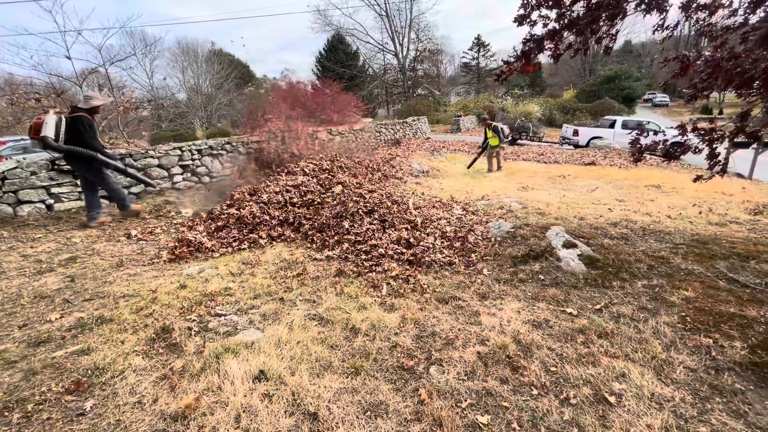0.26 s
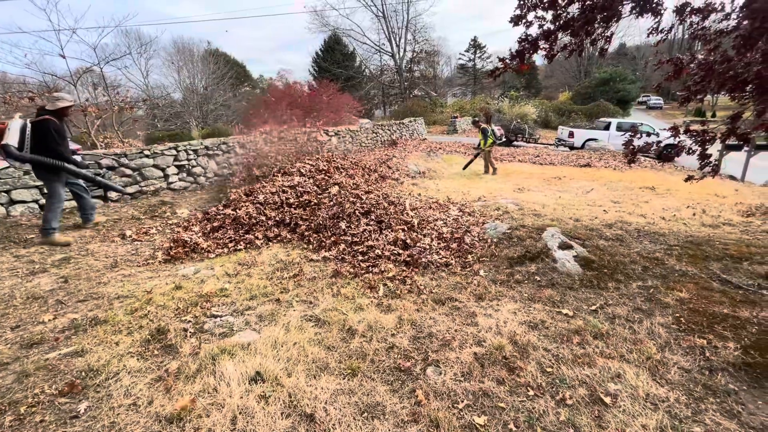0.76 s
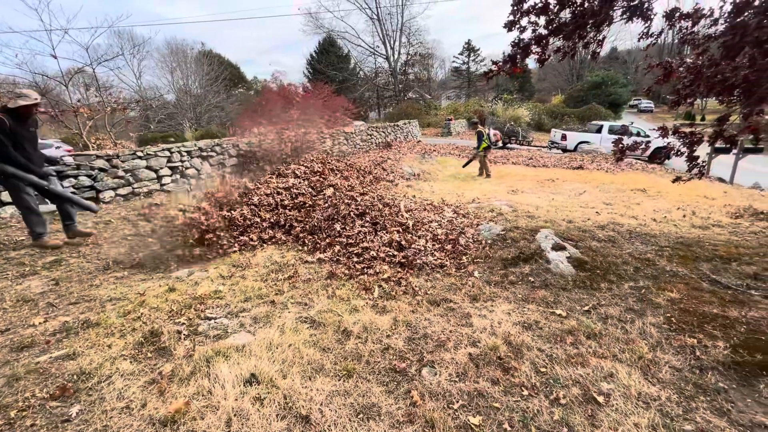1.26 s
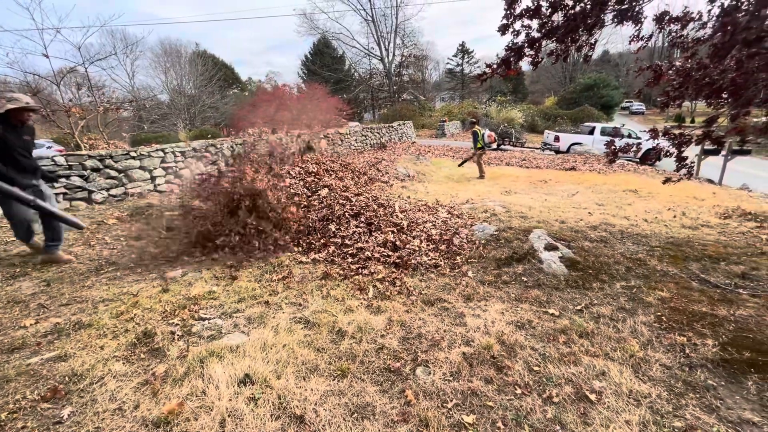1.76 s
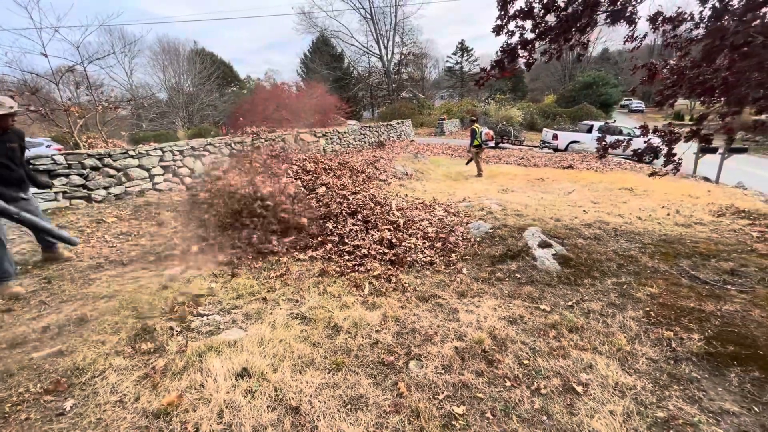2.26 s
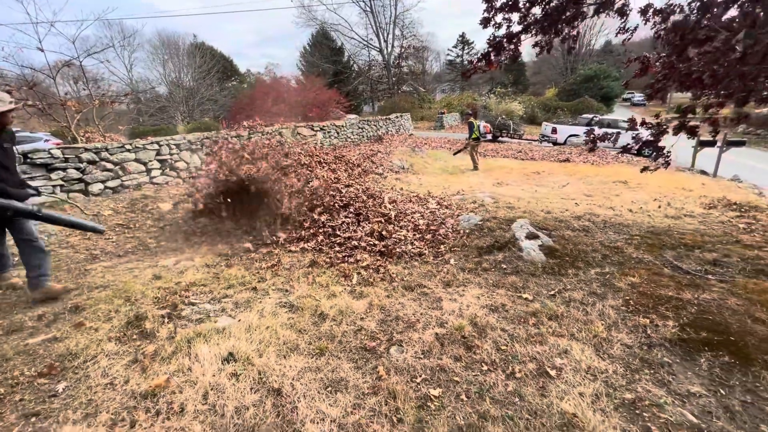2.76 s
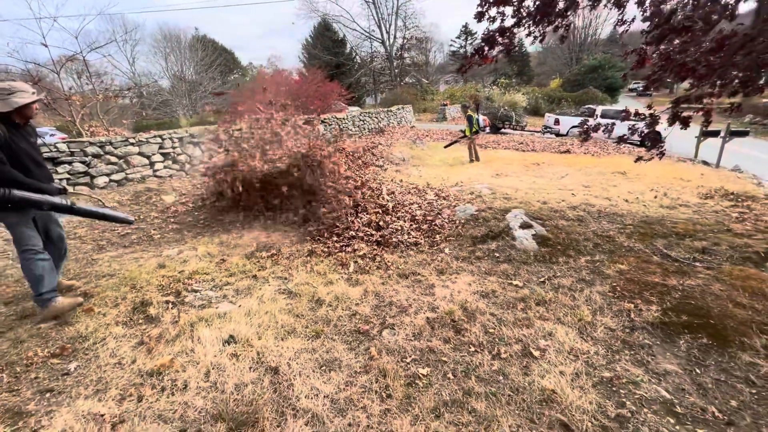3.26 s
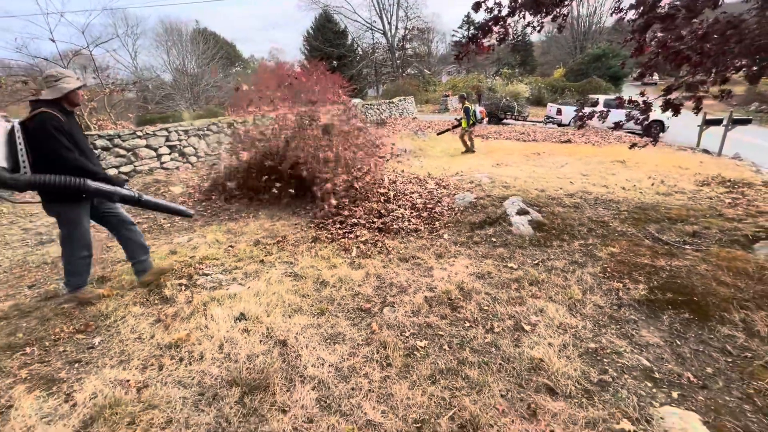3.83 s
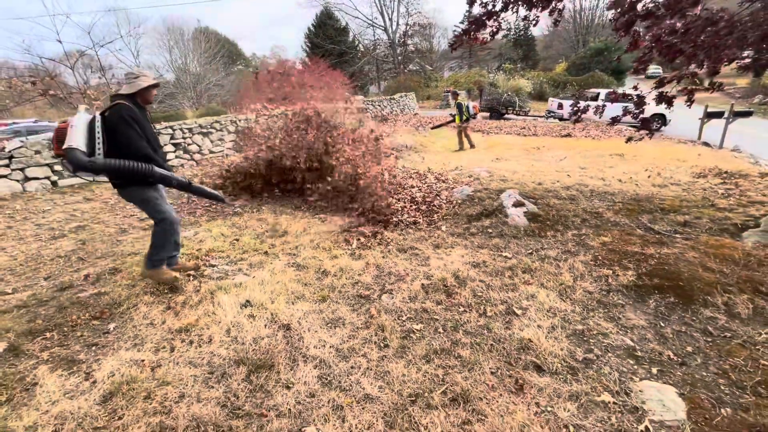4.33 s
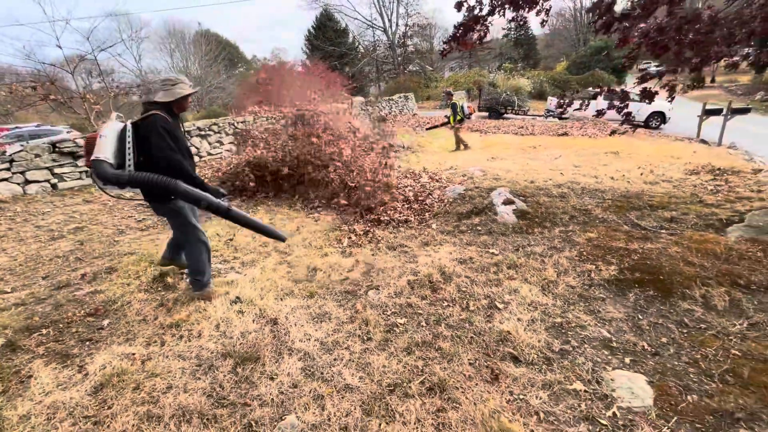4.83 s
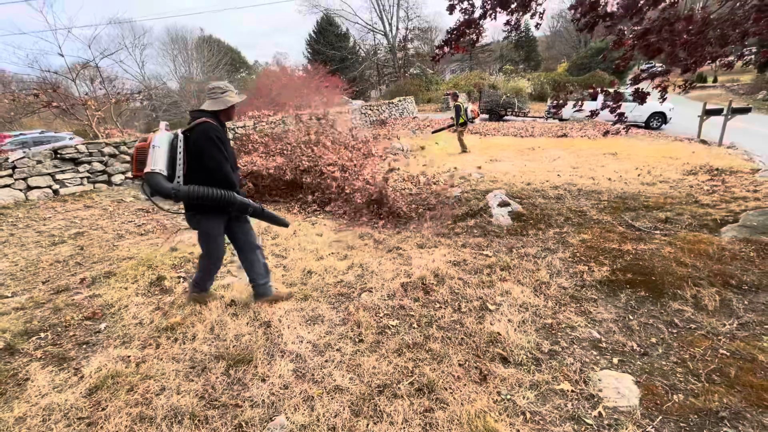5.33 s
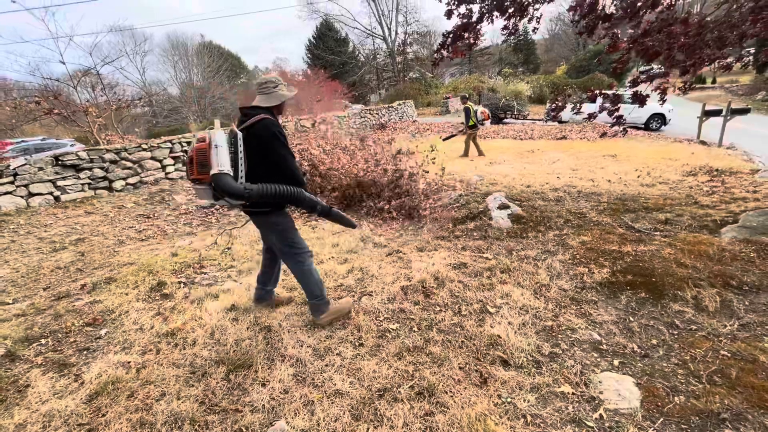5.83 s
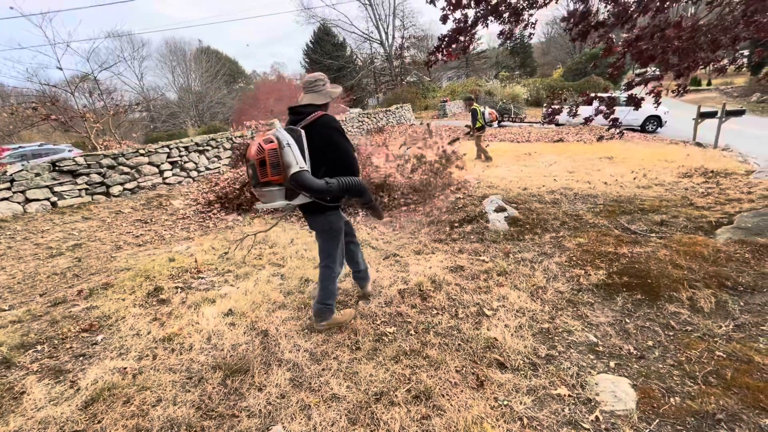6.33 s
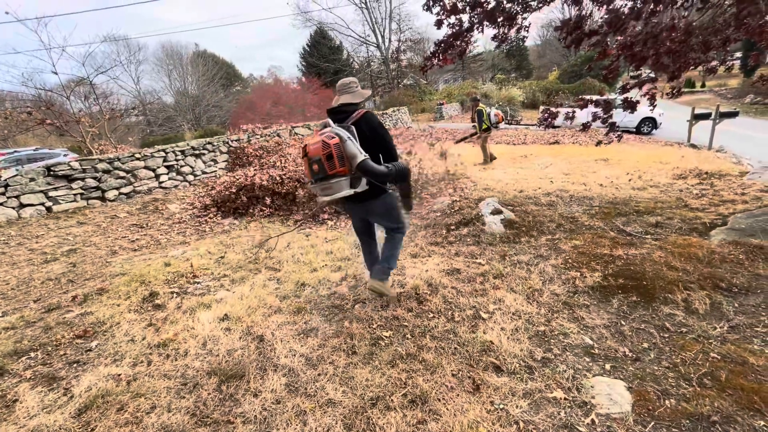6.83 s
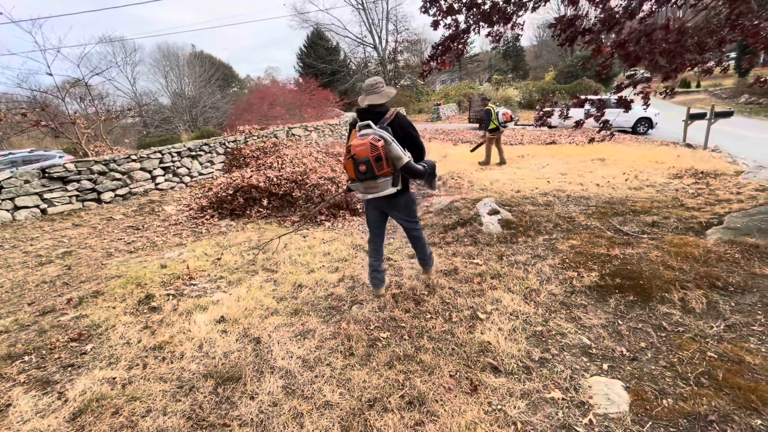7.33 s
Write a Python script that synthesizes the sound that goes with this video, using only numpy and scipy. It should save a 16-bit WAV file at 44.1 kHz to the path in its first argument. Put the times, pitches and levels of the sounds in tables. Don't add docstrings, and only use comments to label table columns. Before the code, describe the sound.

Continuous raspy leaf blower noise in an open yard, with dry leaves churning in a broad rush. The engine speed stays nearly constant while its tone shifts as the worker walks and turns. A second blower climbs in pitch in the distance, then dies away. Low, lumpy wind gusts hit the handheld stereo microphone, slightly stronger on the right; the near machine starts at left and ends almost straight ahead.

```python
import sys
import numpy as np
from scipy import signal
from scipy.io import wavfile
from scipy.ndimage import uniform_filter1d, map_coordinates

SR = 44100
rng = np.random.default_rng(int(sys.argv[2]) if len(sys.argv) > 2 else 0)


def rack_gain(trim_db):
    fader = np.asarray(trim_db, float)
    return 10 ** (fader / 20)


def transcribe(signal):
    frames = np.atleast_2d(signal).T
    limited = np.clip(frames, -1, 1)
    pcm = np.round(limited * 32767).astype(np.int16)
    wavfile.write(sys.argv[1], SR, pcm)


N = 334719
HZ = np.fft.rfftfreq(1024, 1 / SR)[:, None]


def stft(x):
    return signal.stft(x, nperseg=1024, noverlap=768)[2]


def istft(z):
    return signal.istft(z, nperseg=1024, noverlap=768)[1][..., :N]


def along(points, hz, order=1):
    p = np.transpose(points)
    return np.interp(np.log(hz + 1), np.log(p[0] + 1), p[order])


def curves(rows, size=N):
    s, *cols = np.transpose(rows)
    steps = np.linspace(0, N / SR, size)
    return [np.interp(steps, s, c) for c in cols]


def wobble(rate):
    coarse = np.arange(0, N + 64, 64)
    knots = rng.standard_normal(int(N / SR) * 40)
    return np.interp(np.arange(N), coarse, map_coordinates(knots, [coarse * rate / SR]))


def rush(spectrum, centres_hz, levels_db, patchy_db, gate=1, size=(9, 14), repeat=0):
    z = stft(gate * (rng.standard_normal(N) + repeat))
    patches = uniform_filter1d(rng.standard_normal(z.shape), size=size[0], axis=0)
    patches = uniform_filter1d(patches, size=size[1], axis=1)
    steps = np.linspace(0, 1, z.shape[1])
    level = 0
    for row, curve in zip(np.eye(len(centres_hz)), levels_db):
        weight = along(list(zip(centres_hz, row)), HZ)
        level = level + weight * np.interp(steps, np.linspace(0, 1, len(curve)), curve)
    return z * rack_gain(along(spectrum, HZ) + level + patchy_db * patches / patches.std())


def bounce(share, ms):
    return 1 + share * np.exp(-2j * np.pi * HZ * ms / 1000)


def follow(layers):
    # t/s, nearness/dB, muffler, housing and nozzle turned to the phone (level/dB each)
    walk_rows = [(0.0, -25.5, -40, -41, -30), (0.04, -26.5, -39, -31.5, -33.5), (0.78, -27, -34, -35, -31),
                 (1.06, -29, -30, -37, -37), (1.29, -30, -33, -35.5, -36.5), (1.94, -28, -28, -35, -38.5),
                 (2.18, -24.5, -36.5, -37, -36.5), (2.26, -29, -30, -28, -38), (2.71, -26.5, -35, -38, -37),
                 (3.4, -26.5, -29.5, -30.5, -37), (4.59, -27.5, -25, -28.5, -30.5),
                 (4.69, -27.5, -26, -25.5, -34.5), (5.12, -26, -24.5, -27.5, -27),
                 (5.45, -29, -24.5, -24, -28), (6.26, -29, -25, -32.5, -27.5), (6.59, -29, -24, -30.5, -34),
                 (7.53, -30.5, -26, -27, -35.5), (7.59, -32, -22, -24, -35)]
    walk, table = np.array(curves(walk_rows)), np.array(layers)
    return table[:, :1] + table[:, 1:] @ (walk - walk.mean(axis=1, keepdims=True))


def far_blower():
    # t/s, fourth order f/Hz, level/dB
    far_speed = [
        (0, 166, -77),
        (1, 179, -50),
        (1.5, 195.6, -39),
        (2, 215, -39),
        (2.5, 222.2, -37),
        (3, 227.5, -37.5),
        (3.6, 238, -38.5),
        (4.2, 245, -30),
        (7.6, 248, -58),
    ]
    # multiple of its cycle rate, level/dB at full speed, loss/dB per Hz below it
    far_orders = [(4, 0, 0), (6, -14, 0), (10, -7, .5), (11, -8, .5), (12, -13, 0)]
    full_hz = 235
    hz, db = curves(far_speed)
    turn = 2 * np.pi * np.cumsum(hz / 4 * (1 + 0.003 * wobble(9))) / SR
    short_hz = np.clip(full_hz - hz, 0, None)
    tone = np.zeros(N)
    for k, level, loss in far_orders:
        tone += rack_gain(level - loss * short_hz + 2.6 * wobble(4.03)) * np.sin(k * turn)
    return rack_gain(db + 2) * tone


def wind():
    # t/s, peak level/dB, half length/s
    gusts = [(1.123, -37, 0.11), (1.6, -38, 0.36), (2.002, -27, .15), (2.4, -31.5, 0.36), (3.08, -30, 0.15),
             (3.36, -28, 0.18), (3.636, -28.5, 0.13), (4.2, -37, 0.14), (4.664, -29, .1), (5.18, -30, .08),
             (5.5, -36, 0.16), (6.6, -38, .1), (7.095, -34, .2)]
    # f/Hz, level/dB per Hz
    buffet = [(15, -40), (30, -24), (45, -19), (60, 1), (150, -10), (300, -18), (600, -26), (1200, -90)]
    breeze_db = -39
    t = np.linspace(0, N / SR, 400)
    pressure = rack_gain(breeze_db)
    for s, db, half_s in gusts:
        pressure = pressure + rack_gain(db) * np.exp(-((t - s) / half_s) ** 2)
    level = 20 * np.log10(pressure)
    return [rush(buffet, [60], [level + db], patchy_db=3.5, gate=rack_gain(1.8 * wobble(19))) for db in (19, 22)]


def leaves():
    rustle_levels = [
        (-33.5, -0.55, 0.31, 0.033, 0.52),
        (-31.5, -0.3, 0.063, 0.072, 0.28),
    ]
    # f/Hz, level/dB per Hz
    rustle_spectrum = [(30, -50), (100, 1.5), (400, -2.5), (1200, 4.5), (3000, -1.5), (6000, -2),
                       (9000, -7), (11500, -20), (13500, -38), (15000, -35)]
    level = follow(rustle_levels) + 8
    level = level + .7 * wobble(6)
    return [rush(rustle_spectrum, [2000, 6000], level, patchy_db=2.45, gate=rack_gain(0.68 * wobble(25)))
            for port in "LR"]


def crankshaft():
    # t/s, cycle rate f/Hz
    cycle_speed = [(0, 62.58), (1.2, 62.62), (1.85, 62.8), (2.3, 62.52), (3.2, 62.42), (5.2, 62.48),
                   (6, 62.6), (7.59, 62.42)]
    cycle_hz = uniform_filter1d(curves(cycle_speed)[0], size=SR // 4)
    return 2 * np.pi * np.cumsum(cycle_hz * (1 + .001 * wobble(14))) / SR


def lag(k):
    lag_cycles, smear = .7, .11
    housing = 2 * np.pi * k * lag_cycles + smear * (k - 11) ** 2 + .55 * (k % 2)
    return 0.04053 * k * k - 1.28 * (k % 2) + (k >= 8) * housing


def engine_orders(turn):
    group_levels = [
        (-26, 1, 0, 0.23, 0),
        (-30, -.5, 1.11, 0.3, 0),
        (-30, 1, 0.77, 0.44, 0.021),
        (-23, 0.35, 0, 0.71, 0.015),
        (-21, -0.28, 0.26, 0, 0.31),
    ]
    multiples = [(1, -12), (2, 1.74), (3, -12.5), (4, -5), (5, 1), (6, 6), (7, -14), (8, -22.5), (9, -6.5),
                 (10, -4.5), (11, -9), (12, -15), (14, -9), (15, -11.5), (16, -16.5), (17, -23), (18, -29),
                 (19, -20), (20, -25.5), (21, -15), (22, -19.5), (23, -28), (25, -39), (26, -17), (27, -31),
                 (28, -25), (29, -27), (30, -25)]
    groups = follow(group_levels)
    exhaust = np.zeros(N)
    for k, db in multiples:
        group = groups[np.searchsorted([2.5, 4.5, 6.5, 11.5], k)]
        flutter = min(k / 6, 1) * 1.2 * wobble(5)
        sway = .02 * k * wobble(5)
        exhaust += rack_gain(group + db + flutter + 0.5) * np.cos(k * turn - lag(k) + sway)
    return exhaust


def impeller(turn):
    # t/s, order 13 level/dB, order 24 level/dB
    whistle_levels = [(0.0, -31, -34), (0.5, -55, -39), (0.8, -36, -40), (1.05, -25.5, -34),
                      (1.5, -27, -39), (1.9, -31, -32.5), (2.6, -27, -32), (3.5, -27.5, -36),
                      (4.4, -28.5, -36), (4.8, -27.5, -32), (5.1, -25, -26.5), (5.5, -33, -27),
                      (6.0, -24.5, -30), (6.5, -22.5, -35), (7.1, -21.5, -53), (7.6, -28.5, -53)]
    whistle = np.zeros(N)
    for k, db in zip((13, 24), curves(whistle_levels)):
        whistle += rack_gain(db + 3 + 1.1 * wobble(6)) * np.cos(k * turn - lag(k) + .25 * wobble(5))
    return whistle


def puffs(turn):
    jet_lag = .55
    swell_db = 2.83 * np.cos(turn - 2 * np.pi * jet_lag) + 0.98 * np.cos(2 * turn)
    return rack_gain(swell_db + 0.69 * wobble(30))


def exhaust_roar(puff):
    # f/Hz, level/dB per Hz
    roar_spectrum = [(30, -25), (50, -3), (90, -15), (220, 2.5), (420, -2), (600, 8), (800, 11),
                     (1050, -8.5), (1400, -62), (2500, -90)]
    roar_levels = [
        (-28.5, 0.83, 0.075, 0, 0),
        (-21, -0.94, 0.86, 0, 0),
        (-23.5, 0.72, .1, 0.47, 0.042),
        (-19.5, 1, .1, 0, 0.014),
    ]
    return rush(roar_spectrum, [118, 293, 600, 910], follow(roar_levels), patchy_db=.9, gate=puff, size=(4, 40))


def air_jet(turn, puff):
    # f/Hz, level/dB per Hz
    nozzle_spectrum = [(400, -90), (700, -61), (1050, -7), (1400, -1.5), (2500, -3.5), (3200, 0.5),
                       (4300, -11), (5500, -0.5), (7200, 0), (9000, -3), (9800, 4), (11500, -14.5),
                       (12300, -54), (13500, -42), (15000, -68)]
    jet_levels = [
        (-31.5, 0.65, .1, 0.0045, -1.26),
        (-33.5, 0.27, 0.072, 0.13, 1.23),
        (-29.5, 0.72, 0.15, 0.11, 0.94),
        (-39.5, 0.64, 0.42, 0.28, 0.12),
    ]
    strokes = rng.standard_normal((9, 706))
    place = turn / (2 * np.pi) % 1 * 705
    clatter = map_coordinates(strokes, [np.linspace(0, 8, N), place], order=1)
    return rush(nozzle_spectrum, [1500, 3600, 4800, 7040], follow(jet_levels) + 9, patchy_db=1.8, gate=puff,
                size=(6, 90), repeat=0.88 * clatter)


def blower():
    # t/s, stone wall delay/ms, ground delay/ms
    echo_paths = [(0.0, 4.2, 2.52), (0.45, 3.77, 1.84), (0.89, 3.8, 1.65), (1.34, 4.25, 1.48),
                  (1.79, 4.34, 1.59), (2.23, 4.12, 1.6), (2.68, 4.34, 1.52), (3.13, 4.34, 1.43),
                  (3.57, 4.35, 1.58), (4.02, 4.2, 1.57), (4.46, 4.14, 1.66), (4.91, 4.16, 1.6),
                  (5.36, 3.85, 1.52), (5.8, 3.67, 1.53), (6.25, 4.04, 1.52), (6.7, 3.96, 1.42),
                  (7.14, 3.98, 1.44), (7.59, 3.83, 1.38)]
    turn = crankshaft()
    puff = puffs(turn)
    jet = air_jet(turn, puff)
    wall_ms, turf_ms = curves(echo_paths, size=jet.shape[1])
    spread = 0.5 * np.clip((HZ - 120) / 60, 0, 1)
    exhaust = stft(engine_orders(turn)) * bounce(spread, wall_ms) * bounce(spread, turf_ms)
    return exhaust + stft(impeller(turn)) + exhaust_roar(puff), jet


def two_ports(motor, jet, rustle_l, rustle_r):
    # t/s, engine bearing (1 left, 0 ahead), nozzle bearing, ground delay/ms, ground share
    bearings = [(0.0, 0.97, 0.99, 1.46, 0.12), (0.75, 1.02, 1.02, 1.41, 0.29),
                (1.5, 1.04, 0.91, 1.37, 0.11), (2.1, 1.0, 0.86, 1.24, 0.03), (2.6, 0.94, 0.87, 1.3, 0.1),
                (3.0, 1.02, 1.0, 1.39, 0.17), (3.75, 1.06, 1.04, 1.4, 0.25), (4.0, 0.96, 1.02, 1.42, 0.11),
                (4.5, 0.85, 1.0, 1.37, 0.16), (4.75, 0.85, 0.98, 1.29, 0.09),
                (5.25, 0.78, 0.96, 1.36, 0.31), (6.0, 0.78, 0.9, 1.44, 0.1), (6.25, 0.7, 0.86, 1.47, 0.13),
                (6.5, 0.6, 0.3, 1.45, 0.17), (7.0, 0.35, 0.2, 1.45, 0.14), (7.59, 0.18, 0.12, 1.55, 0.22)]
    # f/Hz, phase/rad
    lead = [(125.0, 0.5), (310.0, 0.84), (440.0, 1.8), (500.0, 2.77), (560.0, 2.6), (650.0, 2.94),
            (750.0, 1.8), (850.0, 1.65), (1000.0, 2.1), (1500.0, 2.75), (2300.0, 7.4), (3200.0, 11.76),
            (4000.0, 14.3), (5000.0, 16.7), (6000.0, 20.7)]
    # f/Hz, loss/dB
    shade = [(125.0, 1.4), (330.0, -1.5), (440.0, 0.2), (500.0, 1.5), (560.0, 8), (650.0, 6.5),
             (750.0, 18.5), (850.0, 0.5), (1000.0, 4), (1400.0, 3.5), (2000.0, 1.4), (3000.0, 5),
             (4500.0, 4.5), (5500.0, 11), (7000.0, 14.5)]
    # f/Hz, phase/rad, loss/dB
    shared_port = [(7900, 2.8, 8), (8300, 2.2, 4), (8600, 0, 3), (9000, -0.7, 2), (9600, -2.8, .5),
                   (11000, -3.7, 0), (11400, -5.5, 0), (11800, -2 * np.pi, 0)]
    engine_side, nozzle_side, delay_ms, share = curves(bearings, size=jet.shape[1])
    share = np.clip(2.37 * share, 0, 1)
    high = np.clip((HZ - 1100) / 400, 0, 1)
    bearing = engine_side + high * (nozzle_side - engine_side)
    top = np.clip((HZ - 7200) / 1200, 0, 1)
    left = motor + jet * bounce(share, delay_ms) + rustle_l
    steeper = bounce(.7 * share, delay_ms - .2 * nozzle_side)
    late = (motor + jet * steeper + 0.2 * rustle_l) * np.exp(-1j * bearing * along(lead, HZ))
    apart = (late + 1.35 * rustle_r) * rack_gain(-along(shade, HZ))
    shared = (left + 1.3 * rustle_r) * np.exp(-1j * along(shared_port, HZ))
    shared = shared * rack_gain(-along(shared_port, HZ, order=2))
    return left, (1 - top) * apart + top * shared


def scene():
    left, right = two_ports(*blower(), *leaves())
    gust_l, gust_r = wind()
    return istft(np.array([left + gust_l - 0.18 * gust_r, right + gust_r])) + far_blower()


def top_cut(x):
    return signal.sosfilt(signal.butter(12, 15780, fs=SR, output="sos"), x)


def record(dry):
    lost_band = (9680, 10900)
    left, right = stft(dry)
    mid = (left + right) / 2 * ((HZ < lost_band[0]) | (HZ > lost_band[1]))
    side = (left - right) / 2
    mix = istft(np.array([mid + side, mid - side]))
    return top_cut(mix)


dry = scene()
out = record(dry)
transcribe(out)
```